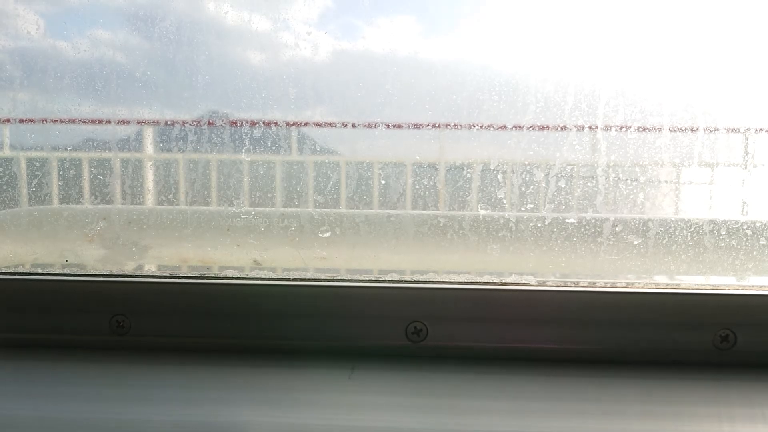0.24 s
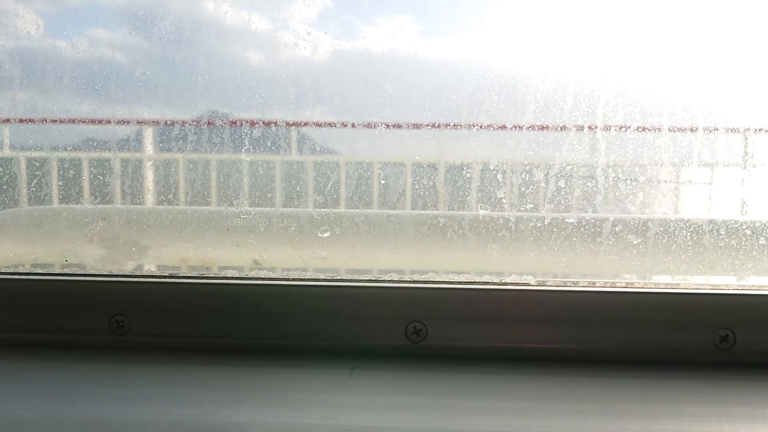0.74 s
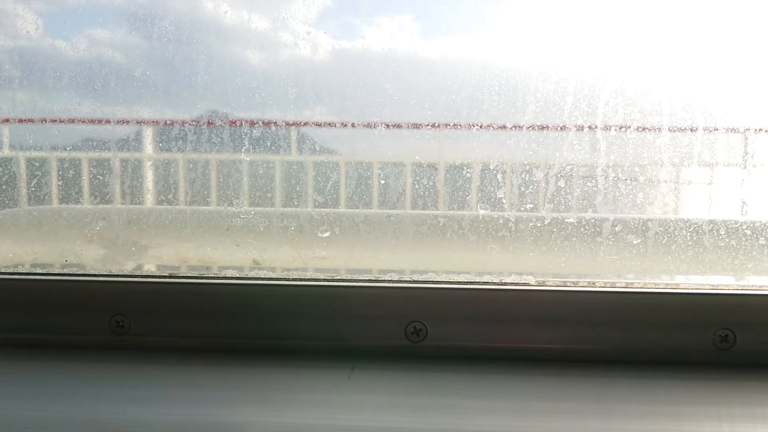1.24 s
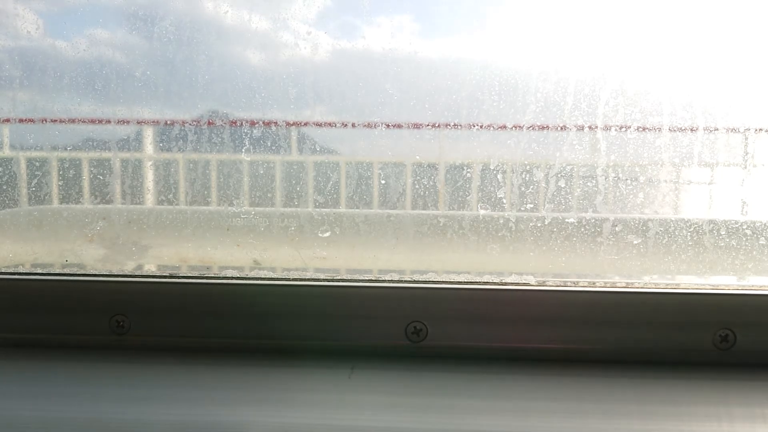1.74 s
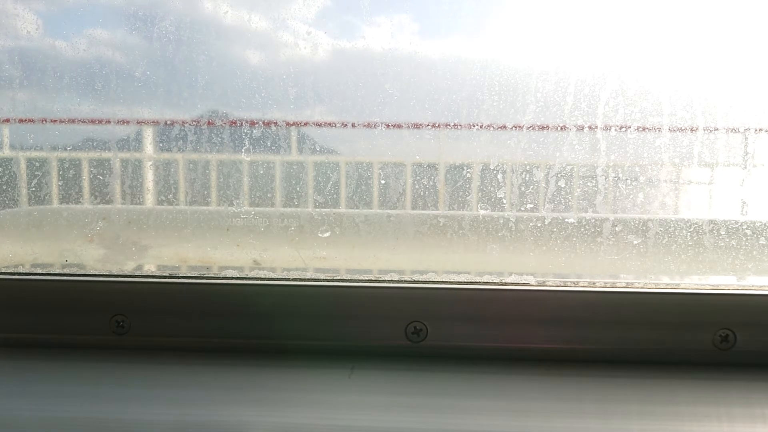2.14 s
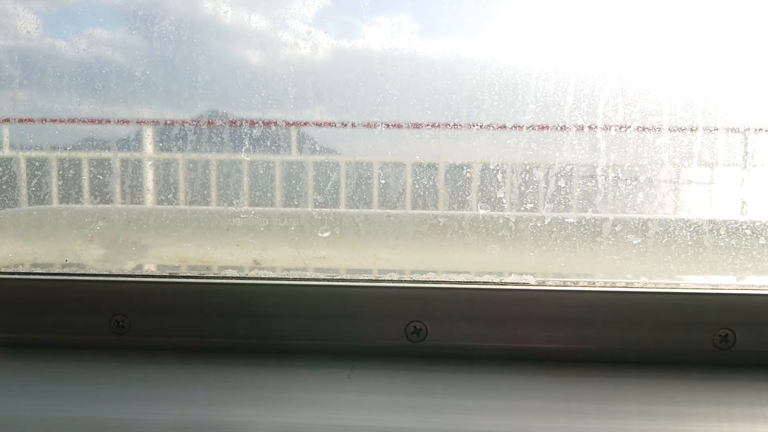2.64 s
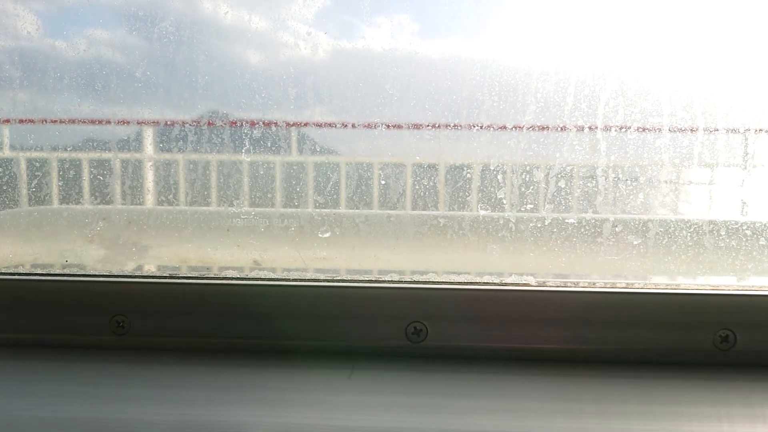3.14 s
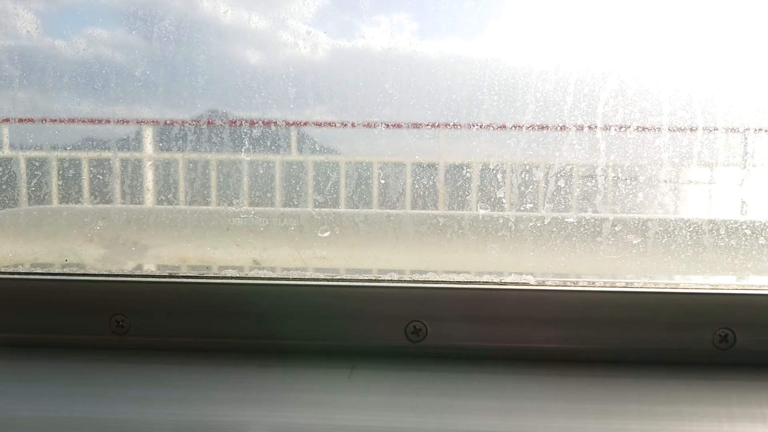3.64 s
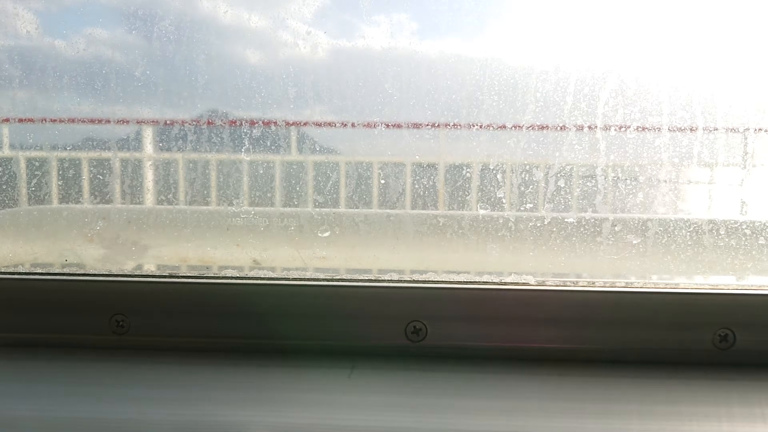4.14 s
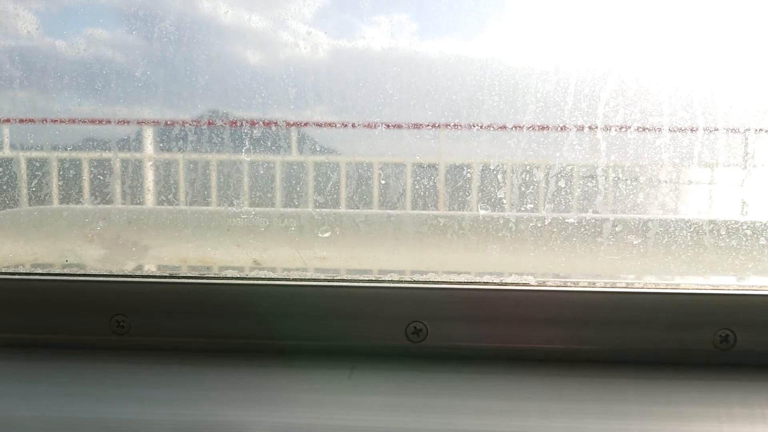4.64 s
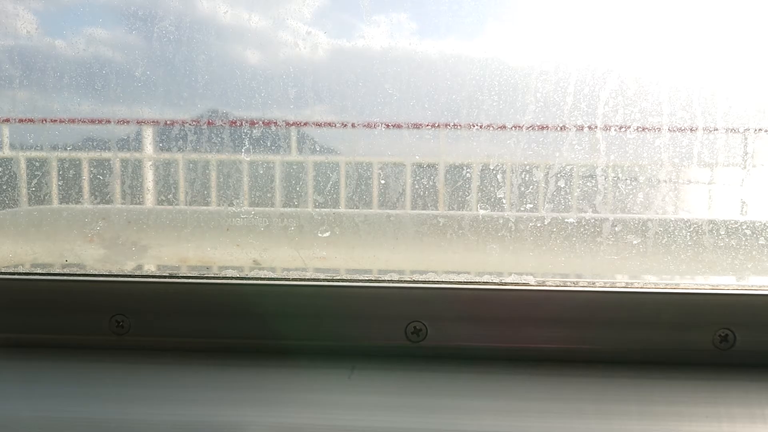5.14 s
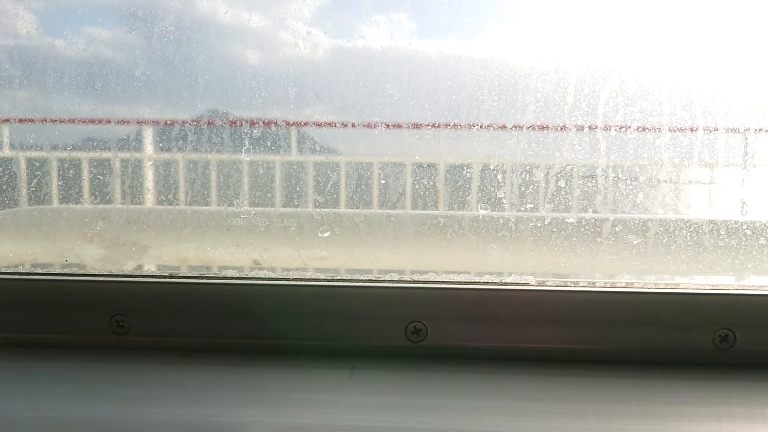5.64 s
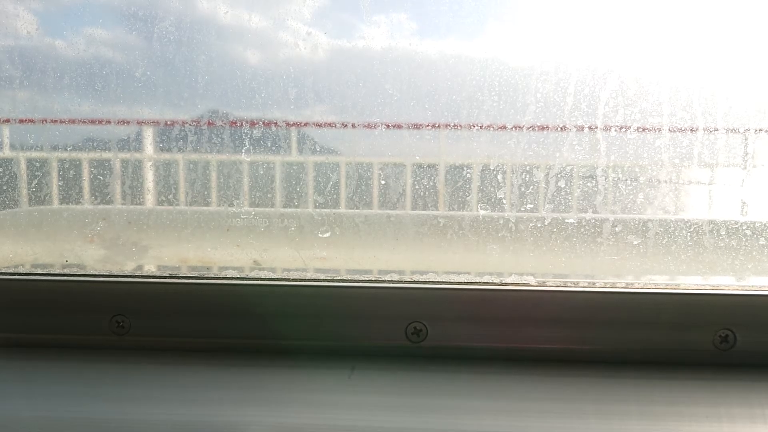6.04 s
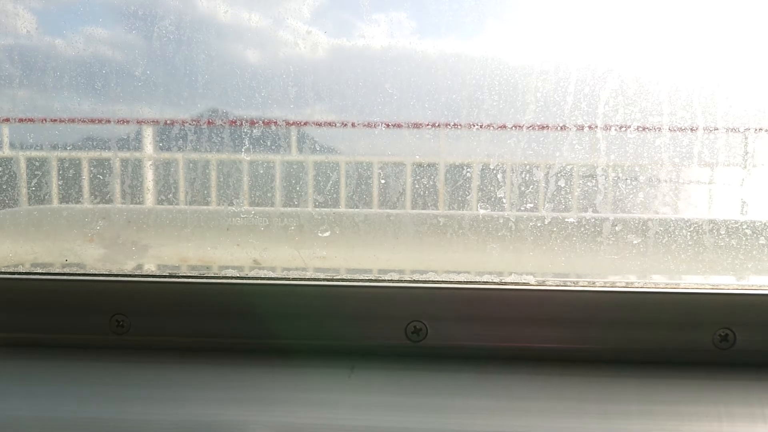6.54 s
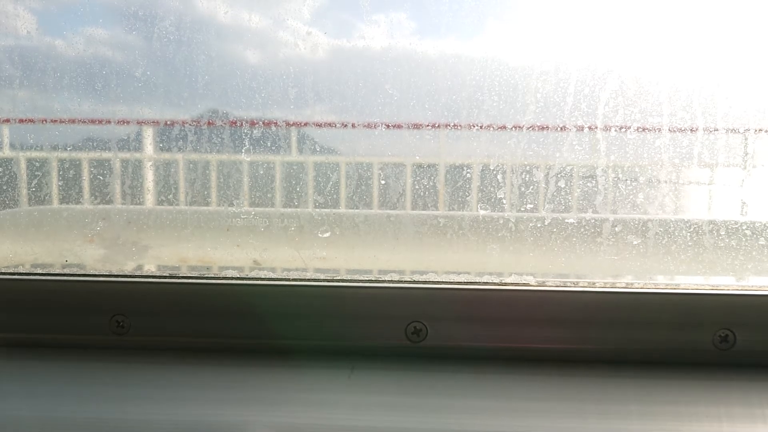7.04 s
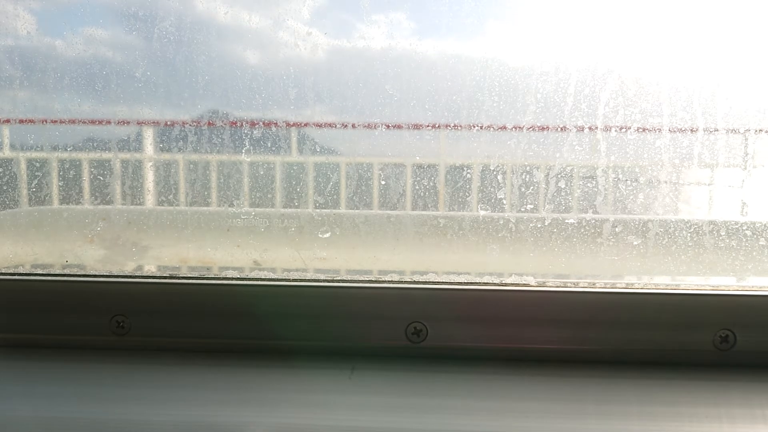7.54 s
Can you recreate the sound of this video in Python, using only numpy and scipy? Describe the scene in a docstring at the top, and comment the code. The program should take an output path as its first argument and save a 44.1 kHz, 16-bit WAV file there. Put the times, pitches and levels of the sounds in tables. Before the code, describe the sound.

A ferry under way heard from its enclosed cabin: a deep, continuous drone of engines and pumps with a pulsing low throb and surging plating boom. Soft blowing air and a barely audible wandering whine lie well beneath it. Small brittle panel creaks scatter through, slightly stronger after four seconds, followed by one dull knock. Faint microphone hiss lifts briefly near the end; the rumble never stops.

```python
"""Cabin of a ferry under way, close to a window.
From the start: engine orders throb, machinery hums (sine lines with drifting gain), the hull rumbles and
booms (coloured noise, one unsteady line), ventilation blows, drones and whines; a faint hiss lies on top.
From 0.6 s wall panels creak softly (bursts of random slips); at 4.5 s a loose fitting taps once
(short noise burst); near 6.9 s the hiss swells once."""
import sys
import numpy as np
from scipy import signal
from scipy.fft import rfft, irfft
from scipy.io import wavfile

SR = 44100
rng = np.random.default_rng(int(sys.argv[2]) if len(sys.argv) > 2 else 0)


def generate_wav(signal):
    """Clip the signal to [-1, 1] and save it as 16-bit WAV at the path in sys.argv[1]."""
    frames = np.transpose(np.atleast_2d(signal))
    scaled = np.clip(frames, -1, 1) * 32767
    pcm = np.round(scaled).astype(np.int16)
    wavfile.write(sys.argv[1], SR, pcm)


N = 343980
TIME_S = np.arange(N) / SR

# weaker engine lines: [multiple of crank speed, level/dB]
WEAK_ORDERS = [(2.48, -52), (4.03, -43), (5, -41.5), (6, -39), (6.74, -46.5), (16.5, -55)]
# slow engine shake through the hull: [t/s, level/dB]
SHAKE_LEVEL = [(0.0, -30), (0.5, -30), (1.15, -33.5), (2.2, -31.5), (2.9, -37), (3.9, -34), (4.4, -38),
               (6.3, -38.5), (7.8, -38.5)]
# engine firing tone through the hull: [t/s, level/dB]
FIRING_LEVEL = [(0.0, -36), (0.45, -27.3), (0.9, -27.5), (1.2, -35), (1.5, -29), (2.3, -26), (2.95, -30),
                (3.4, -36), (4.35, -30), (5.05, -35.5), (5.5, -37.5), (6.6, -26), (7.2, -38.3),
                (7.8, -27.5)]
# strong machinery hum: [t/s, level/dB]
HUM_LEVEL = [(0.0, -43), (0.5, -30.3), (0.85, -32.5), (1.02, -38), (1.14, -50), (1.28, -36), (1.42, -34.5),
             (1.56, -38.5), (1.72, -33.5), (1.95, -32.5), (2.15, -42), (2.45, -41), (2.65, -34.3),
             (3.12, -32.7), (3.35, -39.5), (3.6, -39), (4.08, -32), (4.33, -42), (4.58, -37.5), (4.8, -41),
             (5.2, -35), (5.8, -33), (6.0, -49), (6.2, -35.5), (6.5, -39.5), (6.7, -34.5), (7.05, -36.5),
             (7.23, -46), (7.4, -35.5), (7.8, -34)]
# surging pump: [t/s, level/dB]
SURGING_PUMP_LEVEL = [(0.0, -48.5), (1.4, -44), (2.0, -49), (2.4, -44.5), (3.0, -49), (4.4, -47),
                      (4.75, -41.5), (5.1, -47), (5.45, -44.5), (6.3, -49), (6.7, -43), (7.03, -40),
                      (7.25, -49), (7.8, -50)]
# smaller pumps and fans: [f/Hz, level/dB, wavering part/steady part, left-right phase/rad]
SMALL_MACHINES = [(175.8, -52, .3, -.5), (198.3, -59, .3, 0), (283.5, -55, .7, -.3),
                  (325.5, -56.5, 1.5, -.2), (334, -53.5, 1, -.2), (422, -57, 1.3, -.6),
                  (471.1, -60, .3, -.8), (530, -63, .3, .6), (550, -68, .4, .7), (648, -69, .6, .5),
                  (1048, -73, .4, .8), (1104, -72, 2, .8), (1288, -75, 1.5, 1.2), (1309, -73.3, 1.2, 1.2)]
# hull and water noise, before cabin resonances and drift: [f/Hz, level/dB per Hz]
RUMBLE_SPECTRUM = [(20, -89.5), (26, -75.5), (33, -64), (43, -48.5), (65, -47.5), (90, -54.5), (120, -53.5),
                   (145, -51), (168, -58), (213, -62), (240, -58), (300, -61.5), (390, -66.5), (560, -75),
                   (1000, -100)]
# boom of the plating: [t/s, level/dB]
BOOM_LEVEL = [(0, -38), (.75, -34), (1.25, -42.5), (2.1, -41.5), (2.4, -34), (2.85, -34.5), (3.2, -37),
              (4, -39.5), (4.7, -34.5), (5.1, -41), (6.2, -39), (6.8, -33.5), (7.2, -42), (7.8, -35.5)]
# ventilation air noise, before cabin resonances and drift: [f/Hz, level/dB per Hz]
AIR_SPECTRUM = [(250, -88), (650, -74.3), (840, -77.7), (940, -77.8), (1020, -80.8), (1130, -81.0),
                (1290, -82.3), (1450, -87.2), (1900, -90.9), (2500, -97.7), (3600, -104.5), (5000, -109.8),
                (7000, -114.2), (9000, -130)]
# blower drone as a whole: [t/s, level/dB]
BLOWER_LEVEL = [(0.0, -61), (0.8, -55.5), (1.15, -60), (2.65, -62), (3.1, -54.5), (3.85, -54.5), (4.3, -63),
                (4.85, -57), (5.8, -57.5), (6.3, -64), (7.4, -54.5), (7.8, -58)]
# blower lines: [f/Hz, level re whole/dB, wavering part/steady part, left-right phase/rad, changes per s]
BLOWER_LINES = [(907, -3.7, 1.2, 1.4, 6), (933, -4.5, .6, 1.8, 6)]
# fan whine in the cabin: [t/s, left level/dB, right level/dB, left-right phase/rad]
WHINE_PATH = [(0, -84, -84, .5), (.35, -81, -86, -1.3), (.68, -76, -76.5, -1.6), (.85, -80, -73, -1.8),
              (1.1, -85, -73, -2.2), (1.55, -86, -72, -3.6), (2.1, -85, -73.3, -4.4),
              (2.45, -86, -72.5, -3.9), (2.8, -83, -73.3, -4.7), (3.15, -80.5, -75.3, -6.1),
              (3.55, -78, -86, -6.2), (3.95, -89, -79, -7.8), (4.4, -85, -78, -10.6),
              (4.75, -80, -89, -11.5), (5.2, -75.3, -83, -13.3), (5.7, -80, -90, -14), (6.2, -83, -85, -14),
              (6.5, -88, -75.5, -14), (6.9, -90, -80, -13.2), (7.3, -83.5, -77.5, -12.3),
              (7.8, -90, -78.5, -12.5)]
# panel joint creaks, before the channel gains: [t/s, level/dB, fading time/s, centre f/Hz]
CREAKS = [(.593, -69, .025, 3800), (1.42, -73, .025, 3800), (1.76, -73.5, .018, 4500),
          (2.033, -66, 0.025, 3550), (2.134, -66, .035, 3550), (2.638, -67, 0.055, 3300),
          (2.75, -71.5, .025, 3500), (2.946, -67, 0.02, 3500), (3.166, -66, .033, 3700),
          (3.474, -68, .04, 3600), (4.208, -63, .042, 6600), (4.211, -60.5, .048, 1550),
          (4.72, -67.7, .022, 3500), (5.222, -68, .028, 3600), (5.42, -66.2, 0.024, 3700),
          (6.161, -67.5, 0.04, 3800), (6.461, -68.5, 0.025, 3700), (6.662, -67.5, .03, 3400),
          (6.967, -70, .025, 3600), (7.197, -72, .04, 4200), (7.472, -70, .025, 3800),
          (7.55, -74, .04, 4200)]
# tap spectrum, relative: [f/Hz, level/dB]
TAP_COLOUR = [(300, -25), (1000, -5), (1700, 0), (2400, -5), (3100, -13), (3850, -7.5), (4500, -23),
              (7000, -29), (12000, -45)]
# microphone hiss, before cabin resonances and swell: [f/Hz, level/dB per Hz]
HISS_SPECTRUM = [(5000, -126), (7000, -121), (8200, -123), (10000, -114.9), (12000, -111.2),
                 (14500, -109.4), (15100, -111), (15400, -119)]
# cabin and duct resonances, dips negative: [f/Hz, width/Hz, gain/dB]
RESONANCES = [(112, 14, 1.5), (183, 10, 2.5), (253, 8.4, 2), (266.7, 5.6, -3), (318, 4, -3), (332, 17, 2),
              (430, 18, 2), (432, 7.1, -1), (710, 190, -2), (910, 43, 3), (1235, 55, -2), (2150, 260, 1.5),
              (5400, 1800, -1.85), (7800, 640, -3.5)]
# likeness of the two noise channels: [f/Hz, correlation -1..1]
LIKENESS = [(30, .98), (120, .94), (250, .92), (295, .6), (345, .86), (420, .6), (550, .38), (650, -.05),
            (1000, -.15), (1500, -.32), (2200, -.05), (5000, 0)]
# phase by which left leads: [f/Hz, phase/rad]
LEFT_LEAD = [(40, 0.53), (100, -0.73), (200, 0.29), (290, 0.19), (450, -0.52), (600, 0.55), (1000, -0.43),
             (3000, 0.28)]
# left re right: [f/Hz, level/dB]
BALANCE = [(40, -3), (130, -2), (250, -2), (500, -2.5), (900, -3), (1500, -1.2), (5000, -1), (11000, 2)]

CRANK_HZ, SHAKE_ORDER, FIRING_ORDER = 12.01, 3, 4.492
HUM_HZ, SURGING_PUMP_HZ, BOOM_HZ = 177.95, 233.8, 138.3
WHINE_START_HZ, WHINE_SAG_HZ_PER_S = 3051.5, 4.2
WHINE_WAVER_RATIO, WHINE_CHANGES_PER_S = .25, 16
CREAK_WIDTH_OCTAVES, CREAK_RISE_PER_FADE = 1.3, .05
TAP_S, TAP_RISE_S, TAP_FADE_S = 4.548, .0018, .005
TAP_NOISE_DB = -44.7  # before the envelope
HISS_SWELL_S, HISS_SWELL_HALF_WIDTH_S, HISS_SWELL_DB = 6.93, 0.36, 3.2
FADE_IN_S, EDGE_HZ = .004, 15750


def gain_of(db):
    """Decibels to amplitude."""
    return 10 ** (np.asarray(db) / 20)


def evened(x):
    """Scales to rms 1."""
    return x / np.sqrt(np.mean(abs(x) ** 2) + 1e-20)


def read(points, hz):
    """Linear interpolation of a table on a log-frequency axis."""
    f_hz, value = np.transpose(points)
    return np.interp(np.log(hz + 1), np.log(f_hz + 1), value)


def curves(rows):
    """Columns of a time table, interpolated to the sample rate."""
    t_s, *columns = np.transpose(rows)
    return [np.interp(TIME_S, t_s, column) for column in columns]


def drift(changes_per_s):
    """Slow complex random signal, rms 1, from low-passed noise."""
    size, span_s = 2048, 2 * TIME_S[-1]
    rate_hz = np.fft.fftfreq(size, span_s / size)
    white = rng.standard_normal(size) + 1j * rng.standard_normal(size)
    slow = np.fft.ifft(np.fft.fft(white) / (1 + (rate_hz / changes_per_s) ** 2))
    return evened(np.interp(TIME_S, np.linspace(0, span_s, size), slow))


def placed(hz, lead_rad):
    """Complex left and right gains in the cabin's standing waves, mean power 1."""
    half = gain_of(read(BALANCE, hz) / 2) * np.exp(.5j * lead_rad)
    pair = np.array([half, 1 / half]).reshape(2, -1)
    return pair / np.sqrt(np.mean(abs(pair) ** 2, axis=0))


def noise(spectrum):
    """Stereo noise coloured by cabin resonances; channel likeness follows frequency."""
    hz = np.fft.rfftfreq(N, 1 / SR)
    a, b = rng.standard_normal((2, len(hz))) + 1j * rng.standard_normal((2, len(hz)))
    same = np.clip(read(LIKENESS, hz), -1, 1)
    db = read(spectrum, hz)
    db = db + sum(peak_db / (1 + (2 * (hz - f_hz) / width_hz) ** 2) for f_hz, width_hz, peak_db in RESONANCES)
    # roll-off beyond both ends of the table
    above = 1 + (hz / spectrum[-1][0] / 1.1) ** 12
    below = 1 + (spectrum[0][0] / 2 / (hz + 1)) ** 6
    ends = 1 / np.sqrt(above * below)
    pair = np.array([a, same * a + np.sqrt(1 - same ** 2) * b]) * placed(hz, read(LEFT_LEAD, hz))
    return irfft(pair * gain_of(db) * ends * np.sqrt(N * SR) / 2, N)


def tone(hz, db, waver_ratio, lead_rad, changes_per_s):
    """Machine line; paths through the moving hull add a wavering part to the steady one."""
    turns = np.cumsum(hz * np.ones(N)) / SR + rng.random()
    waver = evened(1 + waver_ratio * drift(changes_per_s))
    line = placed(np.mean(hz), lead_rad) * waver * np.exp(2j * np.pi * turns)
    return np.sqrt(2) * gain_of(db) * line.real


def engines():
    """Crank orders; the shake and firing lines, 18 Hz apart, throb together; each swells and ebbs slowly."""
    crank_hz = CRANK_HZ * (1 + 0.0007 * drift(0.22).real)
    lead_rad = read(LEFT_LEAD, 4 * CRANK_HZ)
    main = [(SHAKE_ORDER, *curves(SHAKE_LEVEL)), (FIRING_ORDER, *curves(FIRING_LEVEL))]
    strong = sum(tone(order * crank_hz, db, 0.04, lead_rad, 0.67) for order, db in main)
    weak = sum(tone(order * crank_hz, db, .25, lead_rad, 1.2) for order, db in WEAK_ORDERS)
    return strong + weak


def machinery():
    """Steady-pitch lines: a strong hum that waxes and wanes, a surging pump, smaller pumps and fans."""
    hum = tone(HUM_HZ, *curves(HUM_LEVEL), 0.083, .05, 1.3)
    pump = tone(SURGING_PUMP_HZ, *curves(SURGING_PUMP_LEVEL), 0.7, .1, 5)
    small = sum(tone(hz, db, waver_ratio, lead_rad, 0.0041 * hz)
                for hz, db, waver_ratio, lead_rad in SMALL_MACHINES)
    return hum + pump + small


def hull():
    """Water and propeller wash rumble through the plating, whose main resonance booms in surges."""
    boom = tone(BOOM_HZ, *curves(BOOM_LEVEL), 7.8, -.1, 9)
    rumble = noise(RUMBLE_SPECTRUM) * gain_of(0.23 * drift(0.75).real)
    return rumble + boom


def fan_whine():
    """Slowly sagging thin line; level and phase per channel make it wander from side to side."""
    left_db, right_db, lead_rad = curves(WHINE_PATH)
    hz = WHINE_START_HZ - WHINE_SAG_HZ_PER_S * TIME_S
    turn = np.exp(2j * np.pi * np.cumsum(hz) / SR)
    left, right = [gain_of(db) * evened(1 + WHINE_WAVER_RATIO * drift(WHINE_CHANGES_PER_S))
                   for db in (left_db, right_db)]
    return np.sqrt(2) * np.array([left * turn * np.exp(1j * lead_rad), right * turn]).real


def ventilation():
    """Rushing air as drifting noise, the blower's two-line drone and the fan whine."""
    air = noise(AIR_SPECTRUM) * gain_of(0.55 * drift(4.6).real)
    drone_db, = curves(BLOWER_LEVEL)
    drone = sum(tone(hz, drone_db + db, waver_ratio, lead_rad, changes_per_s)
                for hz, db, waver_ratio, lead_rad, changes_per_s in BLOWER_LINES)
    return air + drone + fan_whine()


def panels():
    """Each creak is a short burst of tiny slips in a panel joint, scattered by the cabin."""
    size, slips_per_s, tail_s = 16384, 2000, .003
    t_s, hz = np.arange(size) / SR, np.fft.rfftfreq(size, 1 / SR)
    out = np.zeros((2, N + size))
    for start_s, db, fade_s, centre_hz in CREAKS:
        slips = (rng.random(size) < slips_per_s / SR) * rng.standard_normal(size)
        slips *= np.exp(-t_s / fade_s) * (1 - np.exp(-t_s / (CREAK_RISE_PER_FADE * fade_s)))
        slips[0] = 1.5  # the joint lets go
        scatter = rng.standard_normal((2, size)) * np.exp(-t_s / tail_s)
        scatter[:, 0] = np.linalg.norm(scatter, axis=1) / 2  # the direct path leads
        colour = np.exp(-(np.log2((hz + 1) / centre_hz) / CREAK_WIDTH_OCTAVES) ** 2)
        colour = colour / np.sqrt(1 + (hz / 6800) ** 18)
        creak = irfft(rfft(slips) * rfft(scatter) * colour, size)
        creak = np.roll(creak, SR // 1000, axis=1)  # 1 ms later: room for the filter's pre-ring
        # energy: the row's level held for fading time plus tail
        creak = evened(creak) * np.sqrt((fade_s + tail_s) / t_s[-1])
        out[:, round(start_s * SR):][:, :size] += gain_of(db) * creak
    return out[:, :N] * gain_of([[-4], [-2]])  # left, right dB


def tap():
    """A loose fitting knocks once: a soft, dull noise burst, independent left and right."""
    age_s = np.maximum(TIME_S - TAP_S, 0)
    envelope = (1 - np.exp(-age_s / TAP_RISE_S)) * np.exp(-age_s / TAP_FADE_S)
    burst = rng.standard_normal((2, N)) * envelope
    colour = evened(gain_of(read(TAP_COLOUR, np.fft.rfftfreq(N, 1 / SR))))
    return gain_of(TAP_NOISE_DB) * irfft(rfft(burst) * colour, N)


def scene():
    """Sum of all sources at the window."""
    return engines() + machinery() + hull() + ventilation() + panels() + tap()


def microphone_hiss():
    """Faint high noise of the microphone, with one bell-shaped swell in level."""
    swell_db = HISS_SWELL_DB * np.exp(-((TIME_S - HISS_SWELL_S) / HISS_SWELL_HALF_WIDTH_S) ** 2)
    return noise(HISS_SPECTRUM) * gain_of(swell_db)


def record(dry):
    """Adds the hiss, then a short fade-in and a linear-phase low-pass."""
    sound = (dry + microphone_hiss()) * np.minimum(TIME_S / FADE_IN_S, 1)
    low_pass = signal.firwin(511, EDGE_HZ, window=("kaiser", 9), fs=SR)
    return signal.oaconvolve(sound, low_pass[None], "same")


dry = scene()
out = record(dry)
generate_wav(out)
```